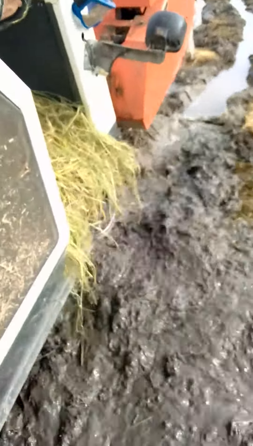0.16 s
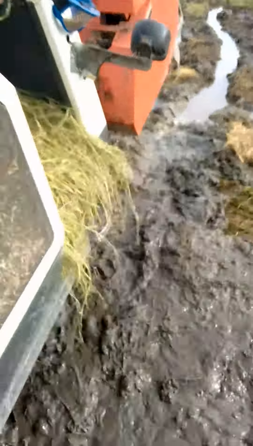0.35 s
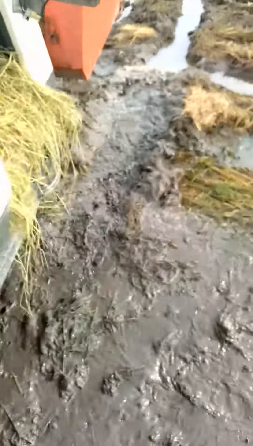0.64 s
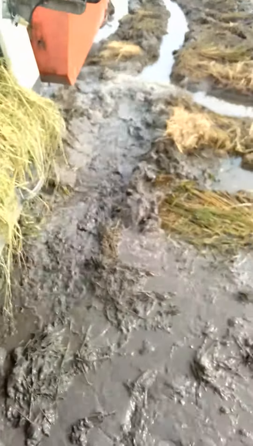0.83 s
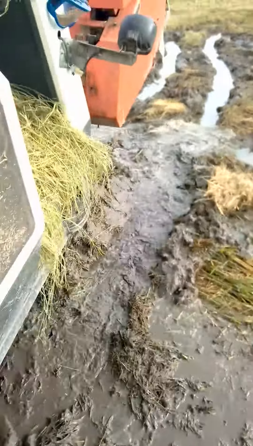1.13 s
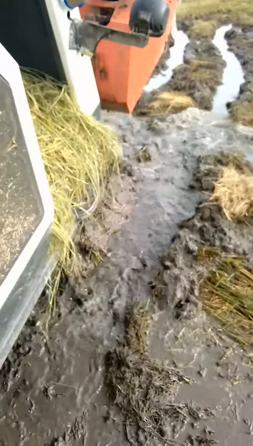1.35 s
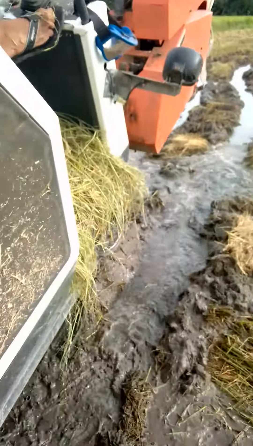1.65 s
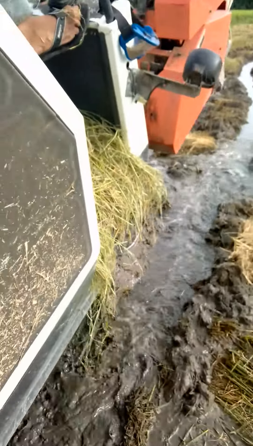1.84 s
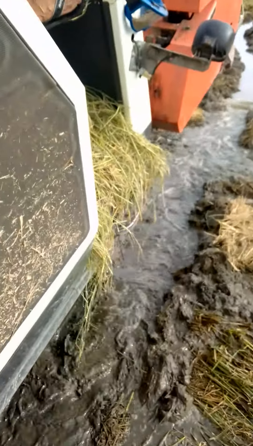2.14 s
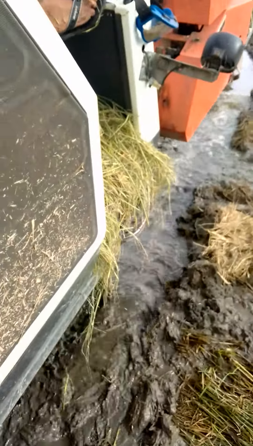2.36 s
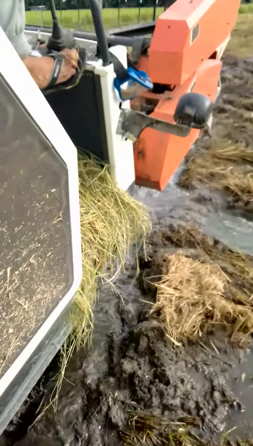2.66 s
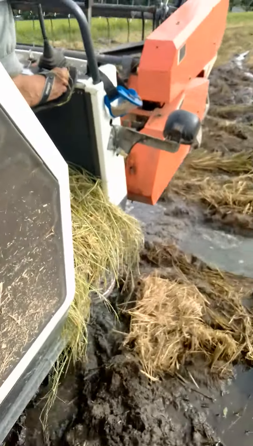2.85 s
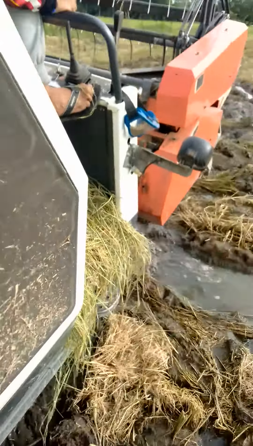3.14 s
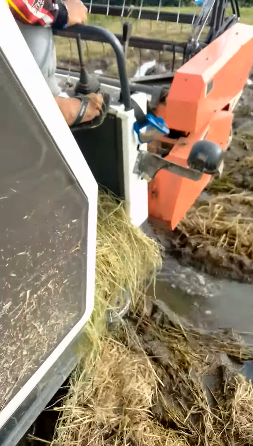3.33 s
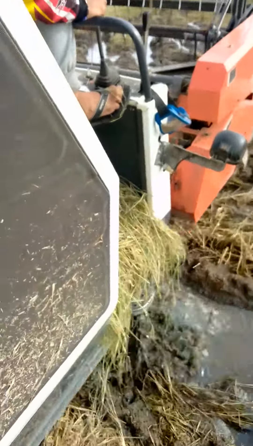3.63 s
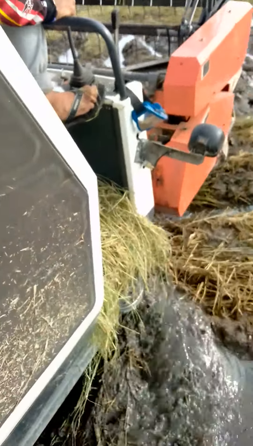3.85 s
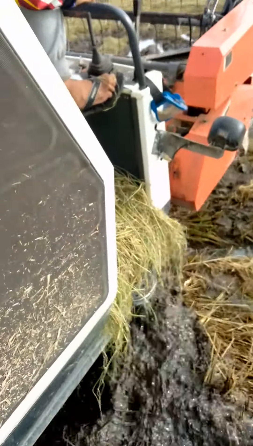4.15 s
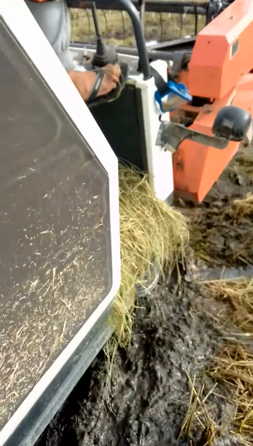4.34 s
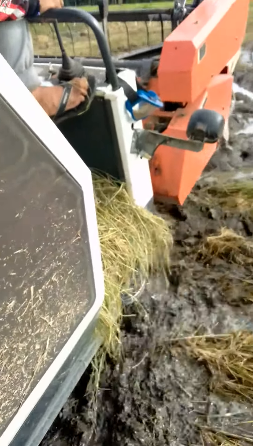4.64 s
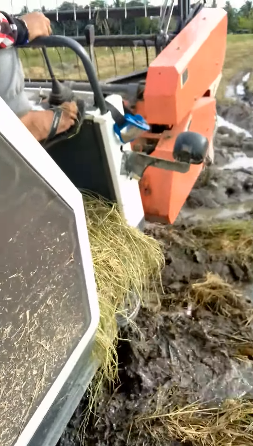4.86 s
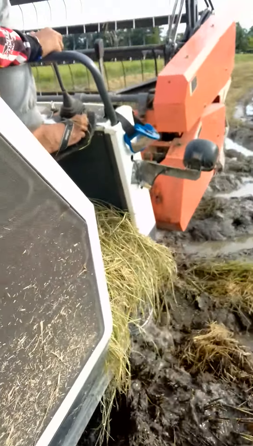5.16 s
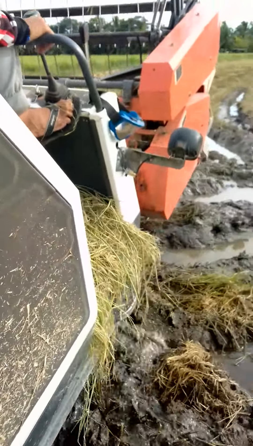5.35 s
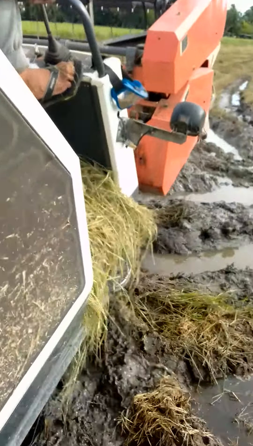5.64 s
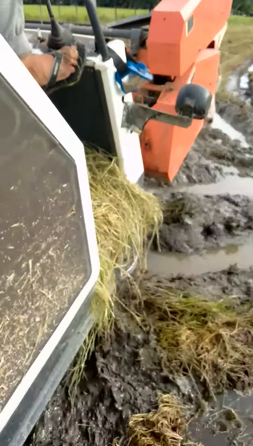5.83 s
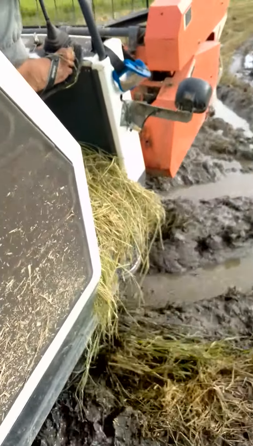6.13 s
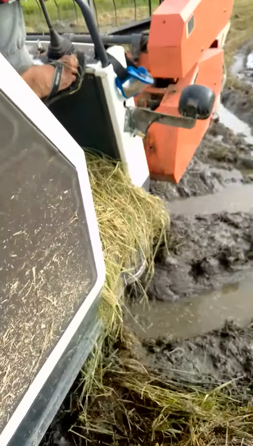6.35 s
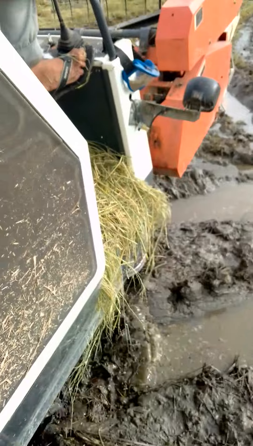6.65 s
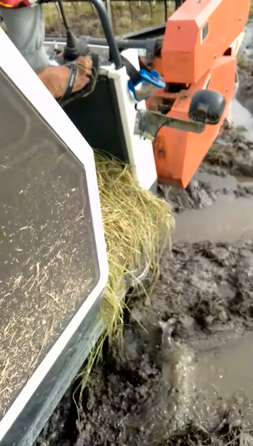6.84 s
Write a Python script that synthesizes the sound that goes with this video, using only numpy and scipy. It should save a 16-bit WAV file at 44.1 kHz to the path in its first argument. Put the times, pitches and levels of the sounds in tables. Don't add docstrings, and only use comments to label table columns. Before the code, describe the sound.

Outdoors on the flank of a working harvester, a diesel drones low with roaring fans, chains and valve clatter. A finger covers the handheld microphone, dulling everything. Near the start, just after one second and again around two and a half, it slips and harsh treble rushes in, with low handling thumps. After three seconds the roar stays muffled and steady.

```python
import sys
import numpy as np
from scipy import signal
from scipy.fft import rfft, irfft, next_fast_len
from scipy.io import wavfile

SR = 44100
rng = np.random.default_rng(int(sys.argv[2]) if len(sys.argv) > 2 else 0)


def inscribe(sig):
    pcm = np.round(np.clip(np.atleast_2d(sig).T, -1, 1) * 32767)
    wavfile.write(sys.argv[1], SR, pcm.astype(np.int16))


def field_ratio(decibels):
    return 10 ** (np.asarray(decibels, dtype=float) / 20)


N = 308259


def rms_one(x):
    return x / np.sqrt(np.mean(x ** 2) + 1e-20)


def in_time(rows):
    s, *columns = np.transpose(rows)
    return [np.interp(np.arange(N) / SR, s, column) for column in columns]


def at_hz(points, hz):
    curve_hz, curve_db = np.transpose(points)
    return np.interp(np.log(hz), np.log(curve_hz), curve_db)


def swells(rows):
    t = np.arange(N) / SR
    return sum(db * np.exp(-((t - s) / spread) ** 2) for s, db, spread in rows)


def drift(rate):
    r = np.exp(-80 * np.pi * rate / SR)
    sparse = rng.standard_normal(N // 40 + 2002)
    slow = signal.lfilter([1], [1, -2 * r, r * r], sparse)[2000:]
    return np.interp(np.arange(N) / 40, np.arange(len(slow)), rms_one(slow))


def resonance(x, hz, width):
    r = np.exp(-np.pi * width / SR)
    zeros = np.array([1, 0, -1]) * (1 - r * r) / 2
    poles = [1, -2 * r * np.cos(2 * np.pi * hz / SR), r * r]
    return signal.lfilter(zeros, poles, x)


def bands(white, low_hz, count):
    edges = low_hz * 2 ** (np.arange(count + 1) / 3)
    for k in range(count):
        sos = signal.butter(2, edges[k:k + 2], "band", fs=SR, output="sos")
        yield np.sqrt(edges[k] * edges[k + 1]), signal.sosfilt(sos, white[k % 2])


# t/s, leak over a full seal/dB
GRIP = [(0, 4.5), (.06, 0), (.1, -12.5), (.12, 9.5), (.75, 7.5), (1.13, 5), (1.48, 2.5), (1.77, 0.5),
        (2.0, -0.5), (2.3, -2.5), (2.42, 3.5), (2.7, 15), (3.02, 9), (3.07, -1), (3.8, -6.5), (6.27, -3.5),
        (6.67, -1.5), (6.99, -6.5)]
# t/s, opening/s, hold/s, closing/s, leak/dB
SLIPS = [(0, 0.013, .004, 0.045, 18.5), (0.104, 0.015, 0.23, 0.016, 20.5), (0.165, 0.14, 0.0088, 0.24, 4),
         (0.43, 0.14, 0.0053, 0.052, 8.5), (0.673, .03, 0.011, 0.038, 6),
         (1.25, .052, 0.0014, 0.0089, -12.5), (1.291, 0.0048, 0.0016, 0.02, 17.5),
         (2.413, 0.052, 0.17, 0.045, 21.5), (2.485, 0.038, 0.008, 0.07, 4), (2.725, 0.041, 0.045, 0.19, 21),
         (1.9, 0.055, .01, 0.13, 4), (2.858, 0.057, 0.034, 0.054, 3), (0.231, 0.055, 0.043, 0.033, -1.5)]


def leak():
    t = np.arange(N) / SR
    leak_db = in_time(GRIP)[0]
    for s, opening, hold, closing, db in SLIPS:
        leak_db = leak_db + np.interp(t, np.cumsum([s, opening, hold, closing]), [0, db, db, 0])
    return leak_db


OPEN_DB = [13.25, 23.8, 27.8, 38.8, 35.5, 26.6]
LEAK_BEND = [0.94, 0.84, 1.58, 1.33, 0.98]
# t/s, level/dB, spread/s
FLARES = [
    (.01, 6, 0.013),
    (.17, 10.5, 0.081),
    (1.0, 4.5, 0.49),
    (2.5, 0.5, 0.026),
    (2.578, 8, 0.05),
    (2.79, 1.5, 0.047),
]
FLARE_SHARE = [0, 0, 0, 0.063, 1.0, 0.54]


def lift(leak_db):
    bass_knee_db, full_leak_db = 17, 36
    share = leak_db / full_leak_db
    bass = np.tanh(leak_db / bass_knee_db)
    upper = np.sign(share) * np.abs(share) ** np.c_[LEAK_BEND]
    return np.c_[OPEN_DB] * np.vstack([bass, upper]) + np.c_[FLARE_SHARE] * swells(FLARES)


# t/s, firing rate f/Hz
SPEED = [(0, 92.4), (.7, 92.2), (1.3, 92.75), (1.9, 93.0), (2.5, 93.6), (3.1, 93.5), (3.7, 94.1),
         (4.1, 93.6), (4.4, 92.7), (4.9, 92.35), (5.5, 92.65), (6.1, 93.15), (6.99, 93.6)]


def firings():
    return np.cumsum(in_time(SPEED)[0]) / SR


# t/s, first order level/dB, second order against it/dB
FIRING = [(0, -42.5, 18), (.25, -24, -1), (.5, -16, -0.5), (.85, -17, -5), (1.2, -22, -3), (1.6, -23, -1),
          (2.2, -28, 0.5), (2.5, -25, 3), (2.95, -26, -0.5), (3.15, -29.5, -2.5), (3.45, -28, -8.5),
          (3.75, -44.5, 5), (4.05, -44, 1.5), (4.3, -33.5, 1), (4.65, -27, -8.5), (5.2, -24, -9.5),
          (5.85, -30.5, -3), (6.99, -36.5, 3)]
# t/s, level/dB, spread/s
PRESSES = [
    (1.26, -5, 0.039),
    (1.335, -5.5, 0.017),
]


def exhaust(turns, leak_db):
    level_db, crest_db = in_time(FIRING)
    first_db = level_db + swells(PRESSES) + 1.2 * drift(4.5)
    second_db = first_db + crest_db + 0.079 * leak_db
    phase = 2 * np.pi * turns + 0.31 * drift(5.8)
    first = field_ratio(first_db + 1.1 * drift(28)) * np.cos(phase)
    second = field_ratio(second_db + 1.2 * drift(48)) * np.cos(2 * phase - .4 + 0.1 * drift(1.6))
    return np.sqrt(2) * (first + second)


LEAK_HZ = [420, 1000, 2050, 3000, 4300, 9000]
SEALED_DB = [-33.5, -42.5, -51.5, -44.5, -36.5, -35.5]
CYLINDER_DB = [1.2, -.4, .2, -1.0, .9, -.9, .5, -.5]
# f/Hz, width/Hz, level over the roar/dB
PANELS = [(342, 24.6, 4), (672, 12, 7.5), (796, 97, -2), (954, 43, 1.5), (1117, 39, -8), (1260, 5.3, -3.5),
          (1648, 69, 8.5), (1970, 320, 12.5), (2545, 610, 2), (3970, 270, -9.5)]
# f/Hz, level per Hz/dB
ROAR = [(200, -15), (330, -8), (430, -12), (470, -14), (1100, -14), (1380, -18.5), (2000, -20), (2450, -24),
        (2800, -37), (3300, -39.5), (4000, -43.5), (5300, -53.5), (6300, -58), (15500, -76.5)]
# multiple of the firing rate, level against the roar at the tone's own pitch/dB
UPPER_ORDERS = [(3, -11), (3.5, -9), (4.436, -3), (6, -19), (7, -8), (10, -16), (11.83, -18), (13.31, -13),
                (17.74, -10)]


def roar(turns, lift_db):
    heard_db = lift_db + np.c_[SEALED_DB]

    def port_db(hz):
        weights = [np.interp(np.log(hz), np.log(LEAK_HZ), one) for one in np.eye(len(LEAK_HZ))]
        return np.array(weights) @ heard_db

    cylinder = np.array(CYLINDER_DB)[turns.astype(int) % len(CYLINDER_DB)]
    throb = field_ratio(cylinder + 0.14 * np.cos(2 * np.pi * turns) + 0.48 * drift(30))
    grit = field_ratio(1.3 * np.minimum(rng.exponential(1, (2, N)), 6))
    white = rng.standard_normal((2, N)) * throb * grit
    white = white + sum(field_ratio(db) * resonance(white, hz, width) for hz, width, db in PANELS)

    size = next_fast_len(N)
    colour = field_ratio(at_hz(ROAR, np.arange(1, size // 2 + 2) * SR / size))
    noise = irfft(rfft(white, size) * colour, size)[:, :N]
    noise = noise / np.std(resonance(noise, 400, 400))

    out = 0
    for hz, x in bands(noise, 218.4, count=19):
        flutter_db = 0.043 * lift_db[2] * drift(14)
        out = out + field_ratio(port_db(hz) + 0.92 * drift(2.9) + flutter_db) * x
    for order, db in UPPER_ORDERS:
        wobble = .45 * drift(5)
        level = field_ratio(db - 4.0 + port_db(order * 93) + 2.17 * drift(3))
        out = out + level * np.sin(2 * np.pi * order * turns + wobble)
    return out


# t/s, level/dB, spread/s
JOLTS = [
    (0, 15, 0.036),
    (.07, 23.5, 0.069),
    (.22, 7, 0.067),
    (.9, 6, 0.17),
    (1.202, 9, .15),
    (3.3, 3, 0.1),
    (5.699, 3.5, 0.25),
    (6.3, 1.5, 0.19),
    (6.99, -1, 0.056),
]
# f/Hz, level per Hz/dB
SHUDDER_SHAPE = [(22, -30.5), (32, -4.5), (48, -0.5), (75, 1), (130, -1), (160, -3), (240, -12), (330, -28)]


def shudder(bass_db):
    jolt_db = swells(JOLTS)
    deep_db = -40.5 + jolt_db
    upper_db = -42 + 0.64 * bass_db + 0.66 * jolt_db
    out = 0
    for hz, x in bands(rng.standard_normal((2, N)), 20.35, count=12):
        share = np.interp(np.log(hz), np.log([60, 110]), [0, 1])
        level_db = (1 - share) * deep_db + share * upper_db + at_hz(SHUDDER_SHAPE, hz)
        out = out + field_ratio(level_db + 29.5 + 2.9 * drift(11.0)) * x
    return out


# t/s, level/dB, spread/s
STRAIN = [
    (.35, 9.5, 0.026),
    (.75, 16.5, 0.33),
    (4.85, 11, 0.39),
    (5.6, 10, .6),
]


def pump(leak_db):
    strain_db = swells(STRAIN)
    hz = 821 - 1.1 * strain_db
    level_db = -54 + 0.79 * leak_db + strain_db
    phase = 2 * np.pi * np.cumsum(hz) / SR + .6 * drift(12)
    return field_ratio(level_db - 3.5 + 0.71 * drift(3.4)) * np.sqrt(2) * np.sin(phase)


# t/s, peak level/dB, ring f/Hz, t60/s, click level/dB
THUMPS = [
    (.1035, -5, 62, .055, -50),
    (.9815, -5, 170, .03, -60),
    (1.028, -10, 60, .06, -61),
    (1.2805, -6, 100, .03, -50),
    (1.302, -6, 240, .02, -19),
    (1.300, -6, 60, .08, -50),
    (6.68, -26, 50, .08, -60),
]


def thumps():
    out, t = np.zeros(N), np.arange(6000) / SR
    for s, peak_db, hz, t60, click_db in THUMPS:
        onset = np.minimum(t / 0.0045, 1)
        swing = field_ratio(peak_db + 8.5 - 60 * t / t60) * np.sin(2 * np.pi * hz * t) * onset
        puff = field_ratio(click_db - 60 * t / 0.022) * rng.standard_normal(len(t))
        click = resonance(resonance(puff, 900, 2300), 900, 2300)
        i = round(s * SR)
        out[i:i + len(t)] += (swing + click)[:N - i]
    return out


def scene():
    turns, leak_db = firings(), leak()
    lift_db = lift(leak_db)
    machine = exhaust(turns, leak_db) + roar(turns, lift_db) + shudder(lift_db[0]) + pump(leak_db)
    return (machine + thumps())[None]


def top_cut(x):
    return signal.sosfilt(signal.butter(12, 15720, fs=SR, output="sos"), x)


def record(dry):
    hiss_db, port_hz, port_db, ceiling = -67, 6550, -0.5, .74
    hiss = signal.lfilter(*signal.butter(1, 9000, fs=SR), rng.standard_normal(dry.shape))
    ring = resonance(resonance(hiss, port_hz, 2200), port_hz, 2200)
    hiss = hiss + field_ratio(port_db) * ring
    x = (dry + field_ratio(hiss_db) * hiss) / ceiling
    mix = ceiling * x / (1 + np.abs(x) ** 6) ** (1 / 6)
    return top_cut(mix)


dry = scene()
out = record(dry)
inscribe(out)
```